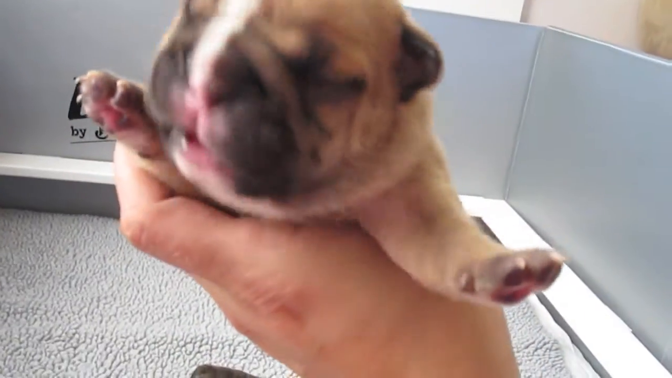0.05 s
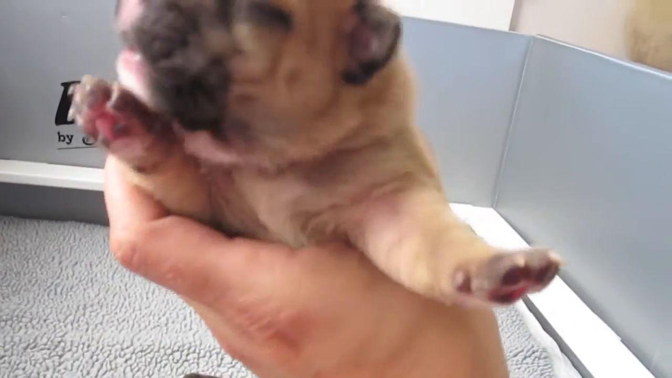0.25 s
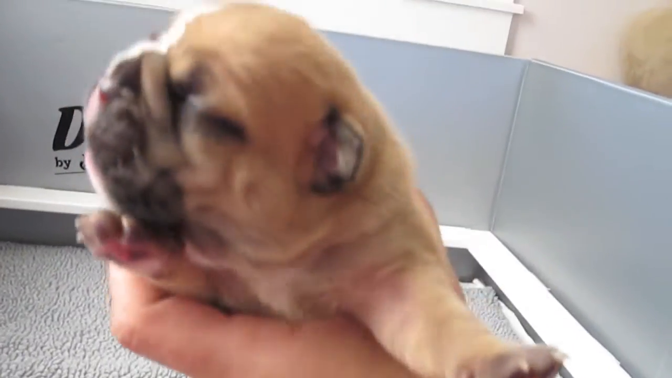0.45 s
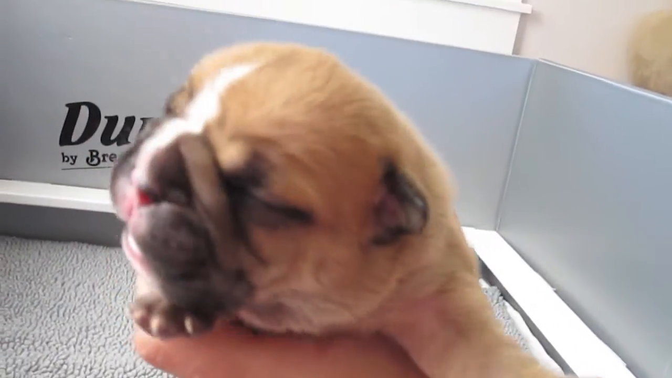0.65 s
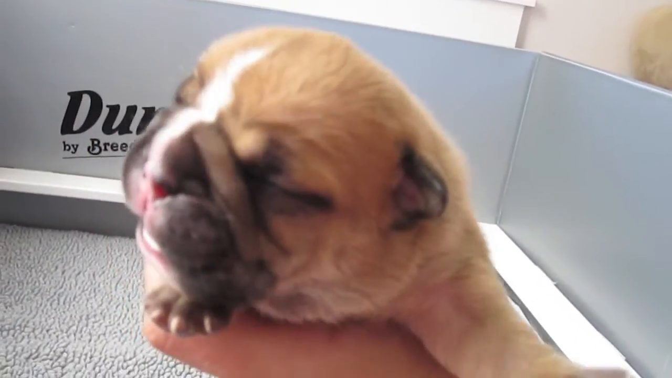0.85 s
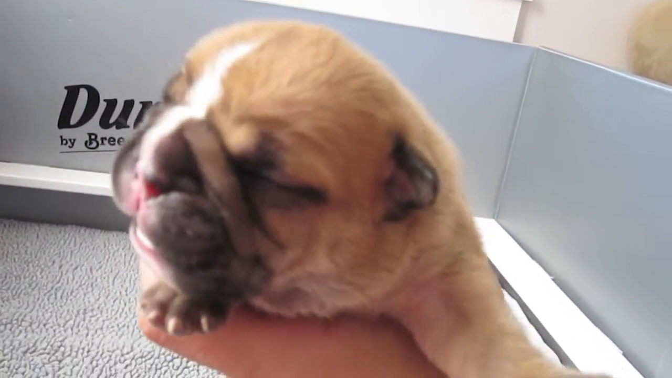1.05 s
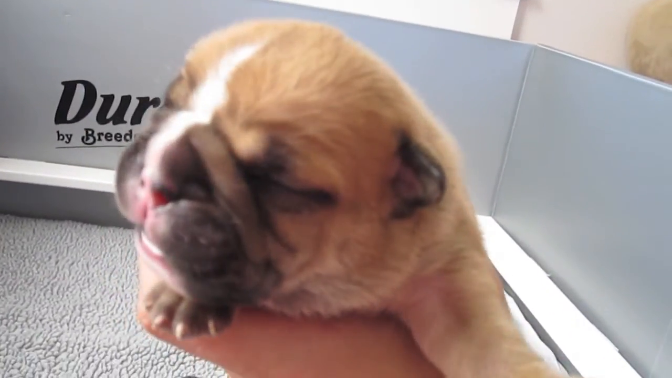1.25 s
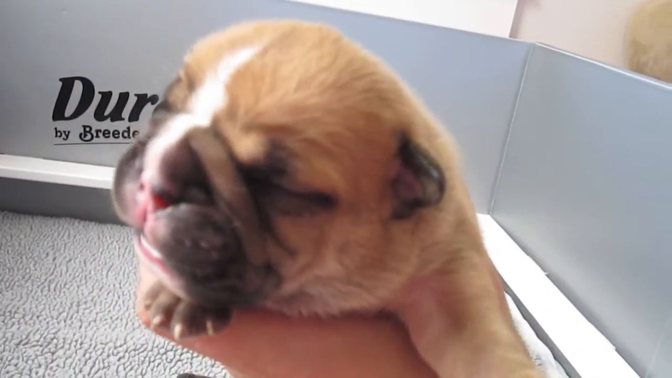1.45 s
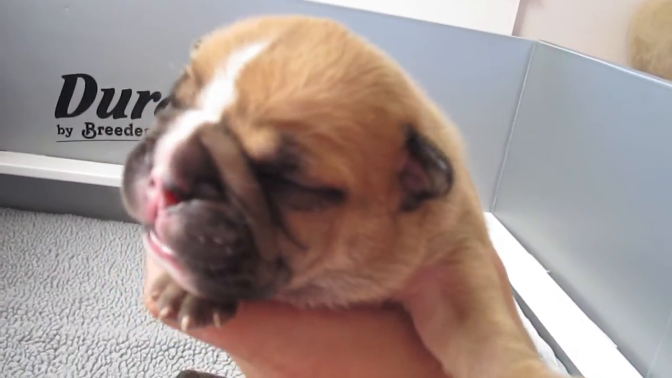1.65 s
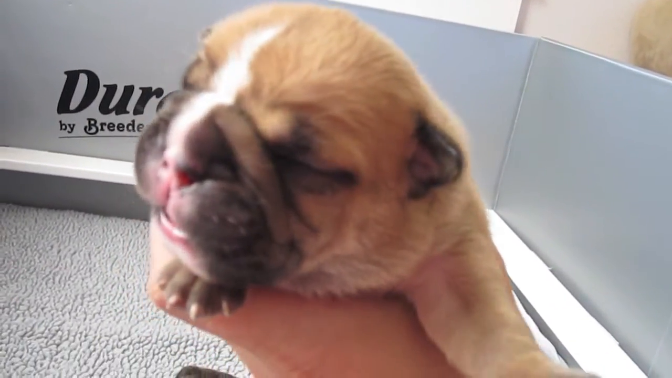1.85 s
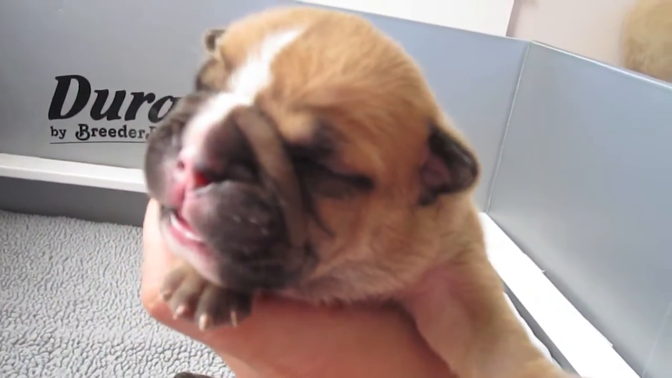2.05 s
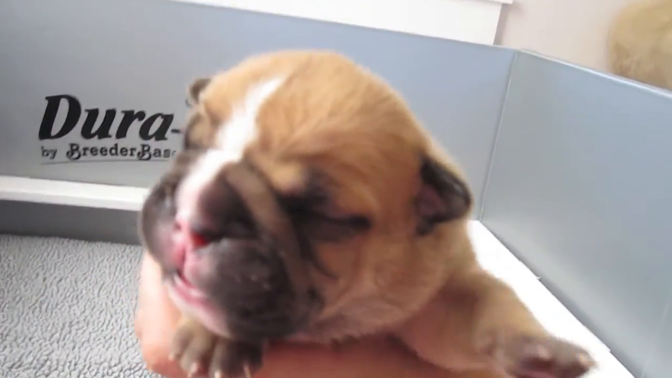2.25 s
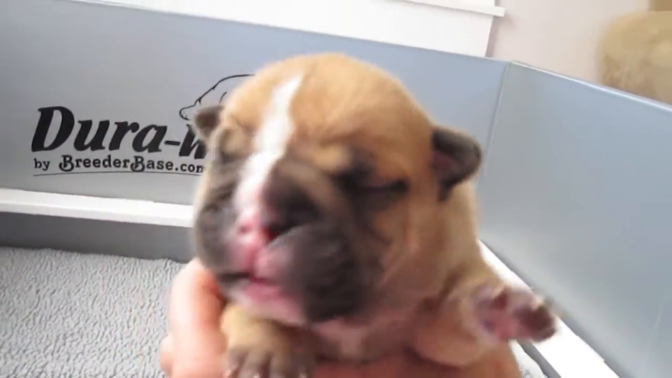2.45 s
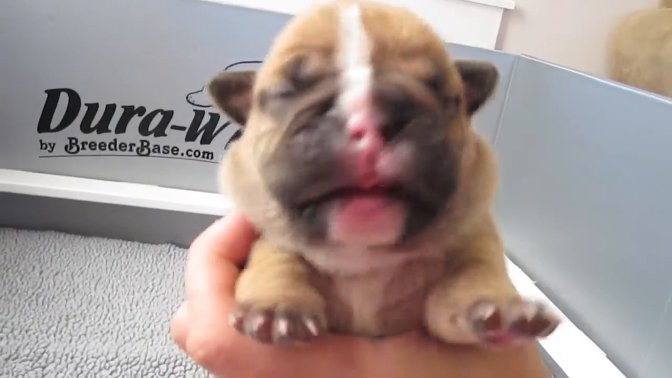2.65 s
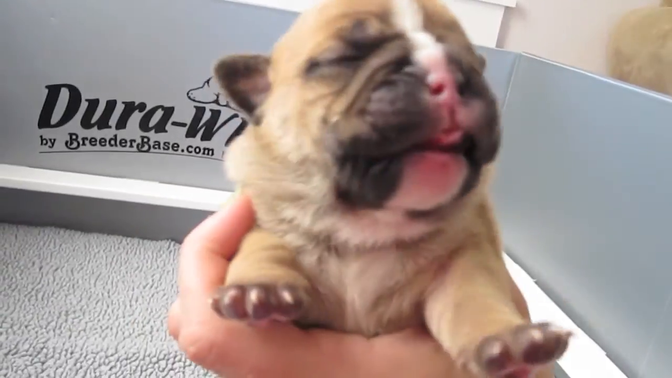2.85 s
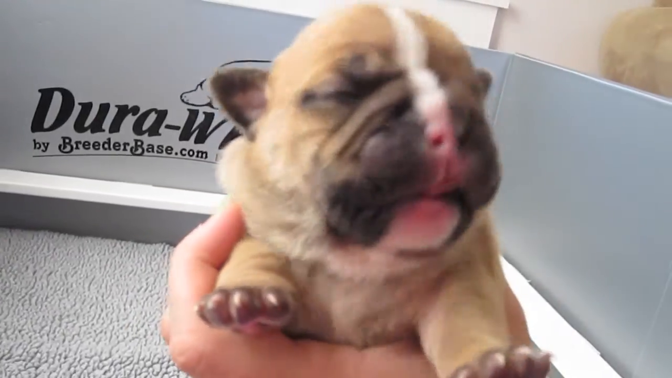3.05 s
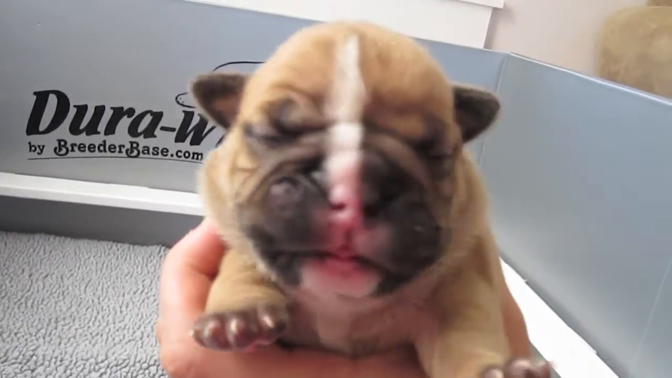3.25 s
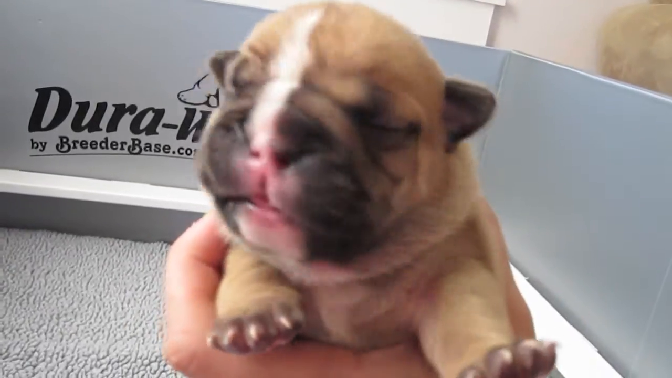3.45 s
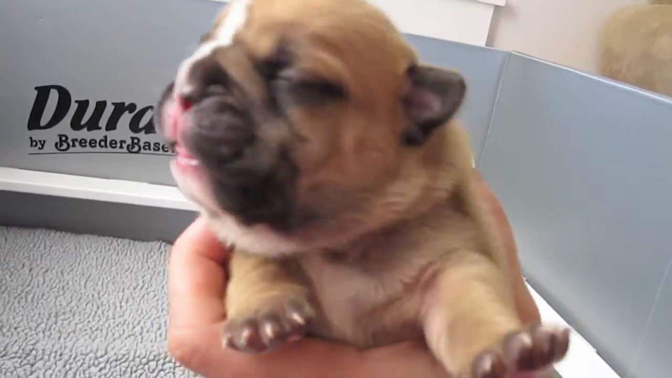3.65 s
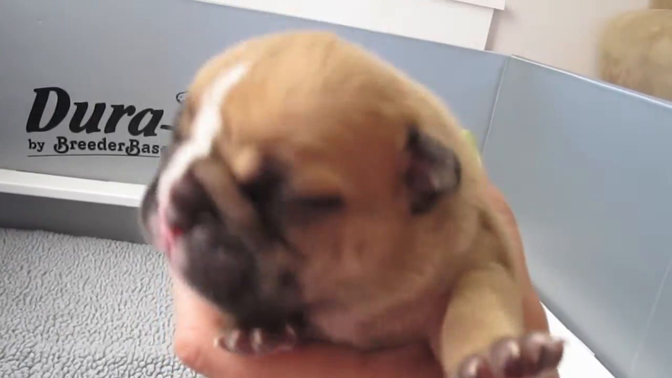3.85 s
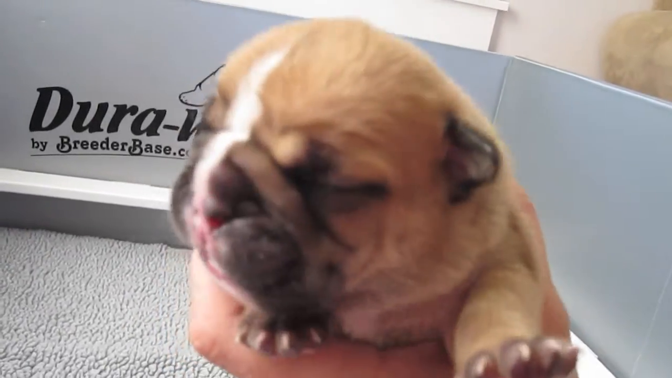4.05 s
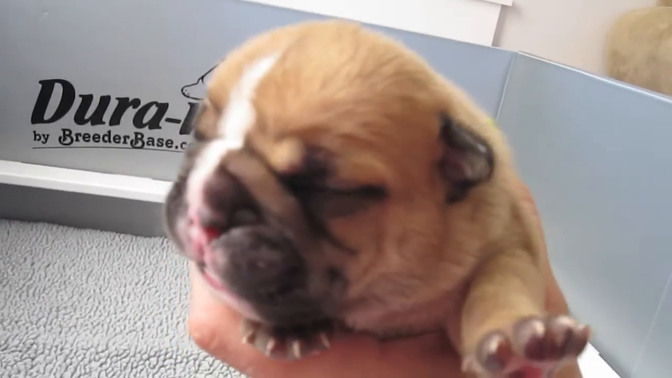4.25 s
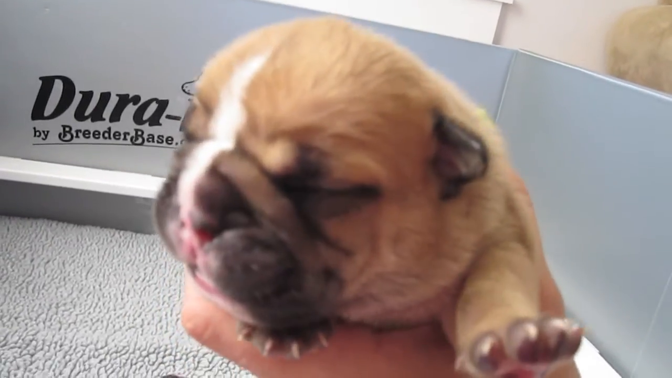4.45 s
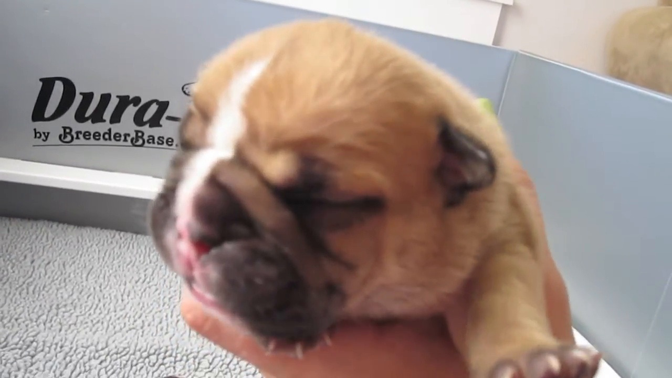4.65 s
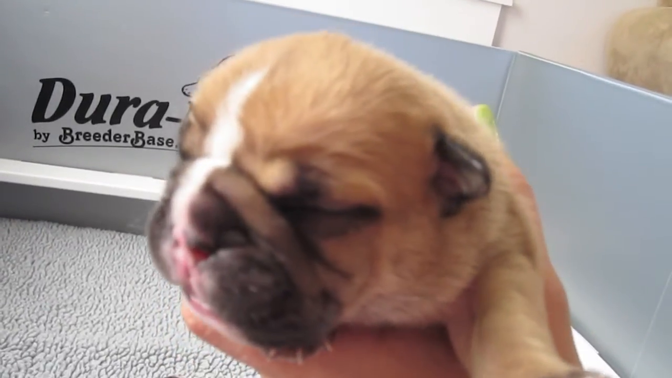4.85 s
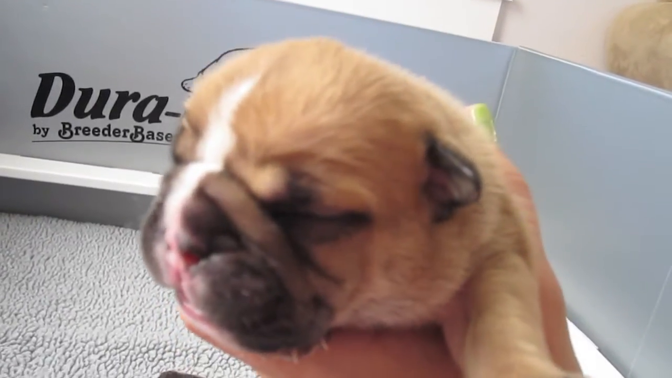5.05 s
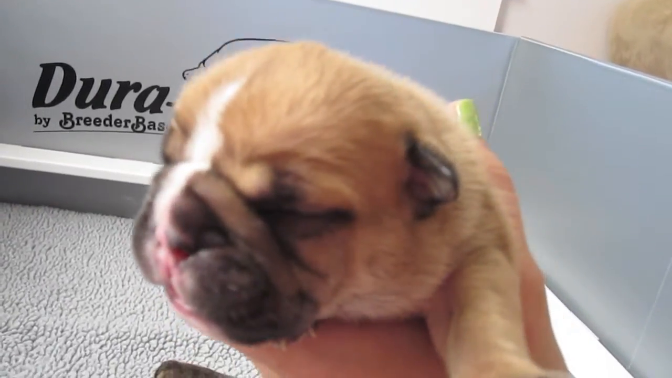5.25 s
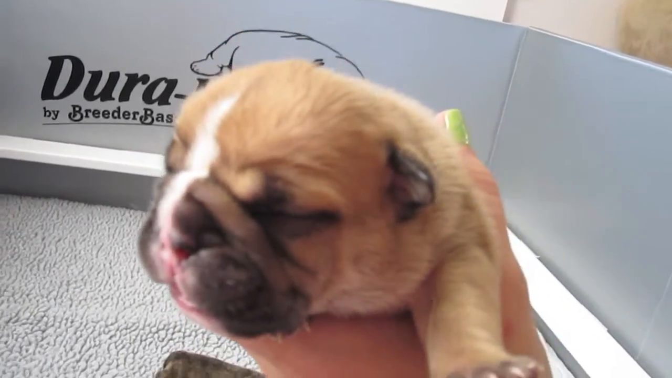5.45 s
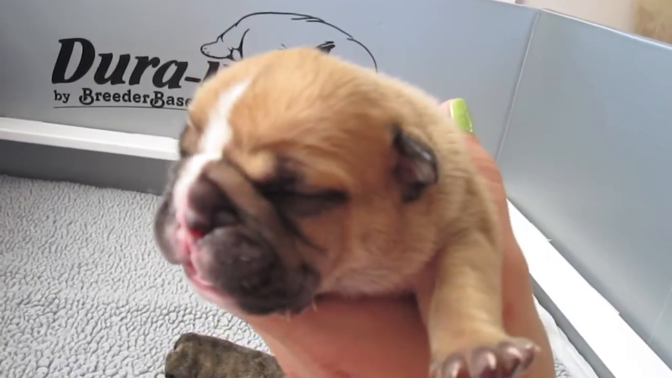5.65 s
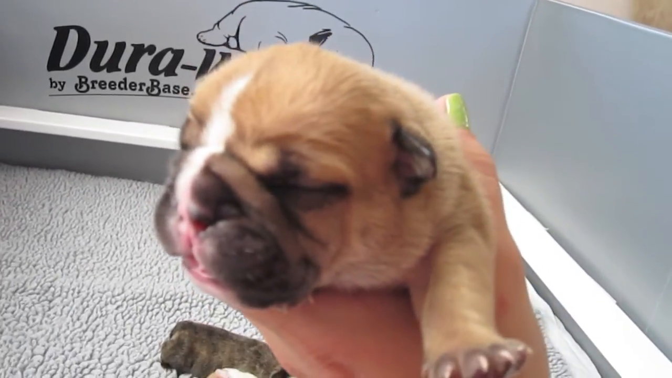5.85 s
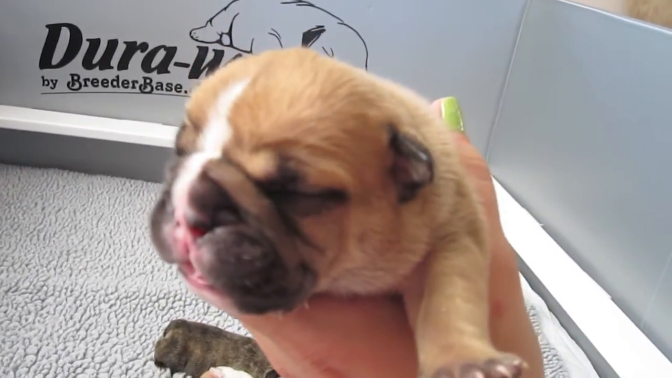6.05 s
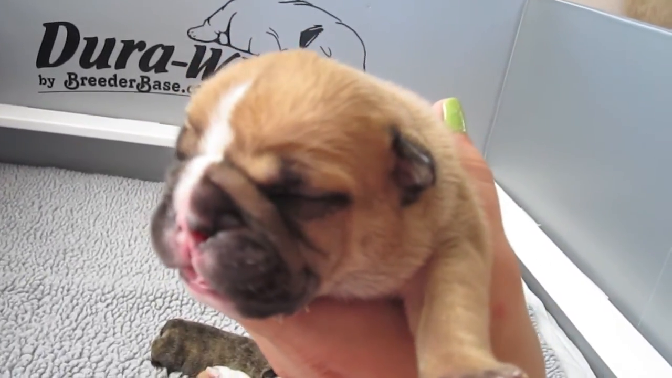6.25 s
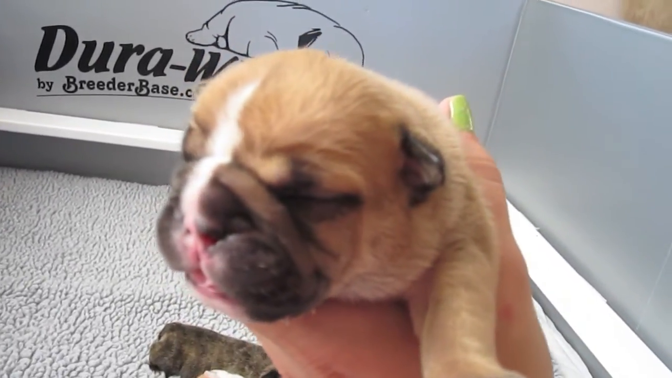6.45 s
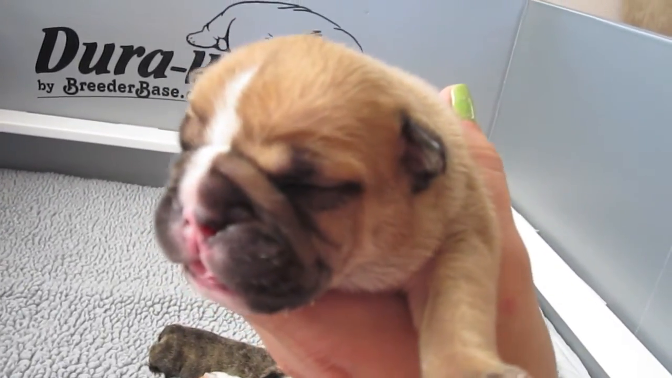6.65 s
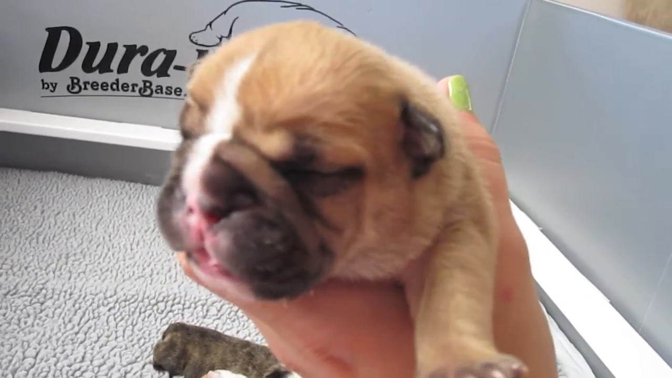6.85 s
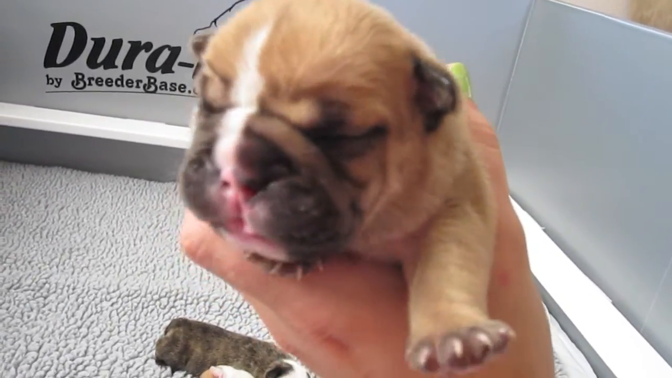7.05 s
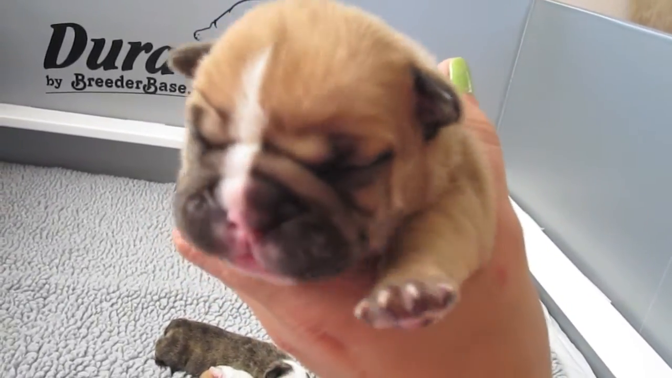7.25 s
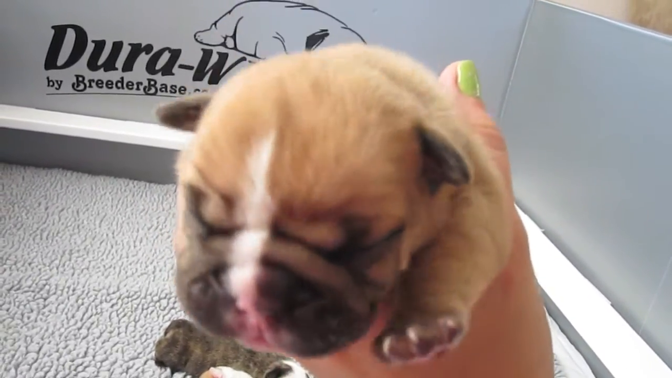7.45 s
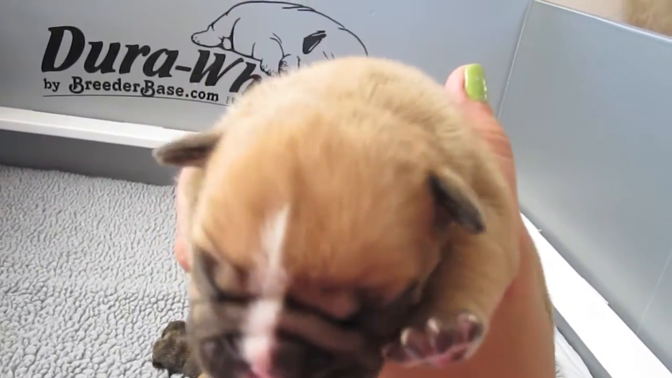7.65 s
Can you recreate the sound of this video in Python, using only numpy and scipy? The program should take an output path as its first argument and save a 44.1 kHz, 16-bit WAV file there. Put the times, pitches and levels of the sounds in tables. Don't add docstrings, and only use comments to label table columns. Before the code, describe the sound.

A newborn puppy grunts hoarsely and whimpers up close while thin high squeals, one sharp yelp and tiny lip clicks punctuate a humming room.

```python
import sys
import numpy as np
from scipy import signal
from scipy.fft import rfft, irfft, next_fast_len
from scipy.io import wavfile
from scipy.ndimage import uniform_filter1d

SR = 44100
rng = np.random.default_rng(int(sys.argv[2]) if len(sys.argv) > 2 else 0)


def convert_level_to_amplitude(level_db):
    exponent = np.asarray(level_db, float) / 20
    return 10 ** exponent


def output_pcm(signal):
    pcm = np.clip(np.atleast_2d(signal).T, -1, 1) * 32767
    wavfile.write(sys.argv[1], SR, np.round(pcm).astype(np.int16))


N = 340011
T = np.arange(N) / SR

# frequency in Hz, level in dB per Hz.
ROOM_HISS = [(15, -45), (25, -1.5), (53, -7), (107, -10), (260, -3), (290, -1.5), (553, -5), (1270, -4.5),
             (1380, -0.5), (1540, -3), (6950, -20.5), (7960, -19.5), (15600, -30.5)]
# centre in Hz, width in Hz, level in dB.
APPLIANCES = [(299, 7.1, -82.5), (373.3, 6, -68.5), (1293, 37, -63.5), (1521, 27, -60), (1851, 22, -63.5),
              (2785, 10, -73.5), (3785, 61, -70.5), (9140, 60, -76.5)]
# centre in Hz, width in Hz, level in dB.
MOTOR_MODES = [(79.6, 4.2, -4), (97.6, 30, 7.5), (105.4, 5.2, 3.5), (149, 180, -16.5)]
# time in seconds, level in dB.
MOTOR_LEVEL = [(0, -56), (1.5, -58.5), (2.5, -62), (3.5, -58.5), (6, -63), (7.71, -60)]
# frequency in Hz, level in dB.
CAMERA_WHINES = [(7867.1, -65), (6132, -75)]

# frequency in Hz, level in dB.
THROAT = [(400, -25), (700, -14), (870, -6.5), (1060, -4.5), (1280, 1.5), (1430, -11), (1550, 4),
          (1800, -31.5), (2100, -15), (2500, -69), (5000, -56)]
# frequency in Hz, level in dB.
MUZZLE = [(380, -22.5), (750, -10), (1250, 4.5), (1500, 1.5), (1800, -12), (2200, -9.5), (2450, -22.5),
          (4500, -53)]
# frequency in Hz, level in dB.
MOUTH = [(450, -18), (1080, -1), (1170, -12), (1270, 0.5), (1620, -6), (1900, -12), (2400, -25.5),
         (5000, -44)]
# frequency in Hz, level in dB.
OVERTONES = [(1700, -7), (2150, -14), (2350, -26.5), (2700, -37), (3600, -46.5), (6000, -71)]
# frequency in Hz, level in dB.
STRAIN = [(4000, -18), (5600, -13), (7000, 0), (8200, -4), (9400, -18), (10800, -8), (12300, -24),
          (14300, -11), (16000, -24)]
# frequency in Hz, level in dB per Hz.
NOSE_AIR = [(1500, -5), (3500, 14.5), (5000, 0), (6200, 8.5), (8500, -3), (11000, -2), (15000, -22)]

# start in seconds, length in seconds, level in dB, # tilt reached by the end in
# dB per octave.
GRUNTS = [
    (0.0, 0.098, -48, 28),
    (0.914, .106, -37, 2),
    (1.655, 0.073, -36.5, 12),
    (4.536, 0.091, -39, -6),
    (5.2, 0.092, -48, -13),
    (6.07, .05, -45.5, -12),
    (6.195, 0.037, -48, 4),
    (6.39, 0.061, -48.5, -12),
    (6.972, 0.1, -44, -12),
    (7.389, 0.031, -38.5, -14),
]
# time in seconds, level in dB, tilt in dB per octave.
GROWLS = [
    [(0.518, -42.5, -4), (0.548, -39, 0), (0.62, -34, 10), (0.655, -37, 15), (0.685, -37.5, 7),
     (0.695, -52, 7), (0.76, -54, 7)],
    [(1.25, -47, -7), (1.288, -40, 0), (1.34, -40, 3), (1.382, -34, 7), (1.425, -37.5, 13)],
]
# time in seconds, pitch in Hz, level in dB, tilt in dB per octave.
RASP = [
    [(3.84, 390, -44, 10), (3.862, 365, -36, 12), (3.9, 400, -39, 12), (3.95, 430, -48, 10),
     (4.035, 400, -37, 4), (4.052, 380, -44, 4)],
]
# time in seconds, pitch in Hz, level in dB, tilt in dB per octave.
CREAK = [
    [(6.69, 237.7, -48, 2), (6.72, 228.7, -42, -3.5), (6.757, 239, -45.5, -5)],
]
# start in seconds, length in seconds, first and last pitch in Hz, level in dB.
SQUEAKS = [
    (0.212, .053, 1047, 1094, -42),
    (0.265, 0.027, 1140, 980, -39.5),
    (2.655, .04, 1520, 1508, -34),
    (2.907, .02, 1413, 1051, -29.5),
    (2.987, 0.016, 1282, 1136, -25.5),
    (3.285, 0.022, 1495, 1481, -38.5),
]
# time in seconds, pitch in Hz, level in dB.
SQUEALS = [
    [(1.665, 858, -41.5), (1.71, 841, -51), (1.738, 903, -33), (1.762, 960, -49), (1.794, 877, -32),
     (1.81, 856, -49)],
    [(2.138, 1092, -40), (2.17, 1055, -39), (2.205, 1194, -33), (2.252, 1210, -31), (2.262, 1194, -34.5),
     (2.288, 1310, -25), (2.32, 1365, -29.5), (2.34, 1361, -30), (2.352, 1080, -34)],
    [(3.32, 1513, -33), (3.346, 1393, -26), (3.395, 1427, -28.5), (3.405, 1392, -27), (3.498, 1404, -26),
     (3.51, 1402, -26), (3.575, 1425, -29.5), (3.593, 1360, -25.5), (3.607, 1105, -33.5)],
]
# start in seconds, length in seconds, first and last pitch in Hz, level in dB.
THROBS = [
    (2.695, 0.062, 1443, 1435, -26.5),
    (2.75, 0.072, 1476, 1444, -26),
    (2.825, .05, 1493, 1413, -29.5),
    (2.875, 0.03, 1514, 1436, -29),
]
# time in seconds, pitch in Hz, level in dB,
# muzzle tilt in dB per octave.
MOANS = [
    [(1.792, 419, -33, 5), (1.851, 513, -34.5, 0.5), (1.887, 500, -34.5, -1), (1.912, 417, -44.5, -11)],
    [(4.262, 449, -39, -8), (4.285, 448.5, -33, 1), (4.31, 417, -32, 0), (4.34, 371, -37.5, -2)],
    [(4.878, 314.5, -36, -1.5), (4.905, 345, -36.5, -6), (4.948, 351.7, -32.5, -3.5), (4.96, 354, -39, -7),
     (4.98, 335, -45, -9)],
    [(7.6, 429, -36, -3), (7.632, 539, -39, 1), (7.672, 655, -29.5, 4.5), (7.71, 737, -39, -2)],
]
# start in seconds, length in seconds, first and last pitch in Hz, level in dB.
WHIMPERS = [
    (7.025, .066, 401, 423.4, -37.5),
    (7.3, 0.0857, 382, 445, -31.5),
]
# start in seconds, length in seconds, first and last pitch in Hz, level in dB.
PEEPS = [
    (2.25, .09, 1911, 2105, -56.5),
    (2.74, 0.029, 2208, 2060, -47),
    (2.805, .035, 2094, 2290, -50),
    (2.875, .045, 2280, 2160, -44),
    (3.398, .078, 2087, 2080, -48),
    (3.48, .052, 973, 881, -36),
]
# time in seconds, peak level in dB,
# upper ring against the whole in dB, upper ring in Hz.
CLICKS = [
    (2.462, -30.5, -18, 2730),
    (2.697, -26, -14, 2766),
    (3.014, -23.5, -31, 2744),
    (3.519, -22, -36, 2790),
    (4.24, -32, -22, 2780),
    (4.575, -37, -19, 2800),
    (4.843, -33.5, 2, 2870),
    (5.512, -48, -4, 2733),
    (5.714, -37, -20, 2748),
    (7.411, -19, -8, 2900),
]
# time in seconds, peak level in dB, upper ring against the whole in dB, upper ring in Hz.
TICKS = [
    (4.842, -38.5, 0, 4020),
    (5.458, -39.5, 0, 4305),
    (5.494, -42, 0, 3090),
    (5.615, -41, 0, 3524),
    (6.428, -44, 0, 4870),
    (6.712, -40, 0, 3800),
    (6.749, -38.5, 0, 3800),
]
# middle in seconds, length in seconds, level in dB.
HUFFS = [
    (2.473, 0.015, -53.5),
    (3.018, 0.033, -54),
    (3.535, 0.045, -54.5),
    (4.056, 0.022, -49),
    (4.591, 0.042, -51),
    (4.832, 0.054, -60),
    (4.887, 0.12, -54.5),
    (6.45, 0.037, -57),
    (6.983, 0.038, -59),
    (7.44, 0.065, -58),
]
# time in seconds, pitch in Hz, level in dB, mouth tilt in dB per octave.
GLIDES = [
    [(3.045, 465, -45, -8), (3.127, 532, -37.5, -6), (3.145, 575, -41, -10), (3.155, 585, -35.5, 2.5),
     (3.175, 616, -31, -3.5), (3.234, 666, -33.5, 3.5), (3.3, 643, -44.5, 1)],
    [(3.83, 914, -40, -5), (3.852, 722, -49, 5), (3.92, 901, -36.5, -3), (4.012, 704, -36, 6),
     (4.05, 690, -36, 4.5)],
    [(5.555, 610, -53, -13), (5.611, 710, -40.5, -4), (5.641, 727, -46, -6), (5.664, 708, -34, -1.5),
     (5.695, 775, -37, 4), (5.708, 890, -43.5, -17), (5.722, 930, -55, -7)],
    [(6.12, 698, -43.5, -10), (6.144, 650, -39.5, 0), (6.185, 602, -55, -17), (6.204, 632, -42.5, -2),
     (6.238, 611, -57, -15)],
]
# time in seconds, pitch in Hz, level in dB, mouth opening in dB,
# level of the upper partials in dB.
YELP = [
    [(3.738, 862, -46, 7.5, -81), (3.795, 1113, -25.5, 3, -62), (3.83, 1214, -18.5, 13.5, -57.5),
     (3.89, 1085, -27.5, 5, -57), (3.93, 1103, -26.5, 1.5, -58), (3.98, 1232, -22.5, 12.5, -54),
     (4.011, 1450, -16, 8, -62), (4.021, 1480, -24.5, 11, -55), (4.05, 1223, -54, 0, -73)],
]


def shape(points, hz):
    f, db = np.transpose(points)
    return convert_level_to_amplitude(np.interp(np.log(np.maximum(hz, 1)), np.log(f), db))


def unit(x):
    return x / np.sqrt(np.mean(x ** 2))


def noise(points):
    size = next_fast_len(N, real=True)
    hz = np.arange(size // 2 + 1) * SR / size
    spectrum = rfft(rng.standard_normal(size)) * shape(points, hz)
    return unit(irfft(spectrum, size)[:N])


def wander(hz):
    slow = signal.butter(2, hz, fs=SR / 16, output="sos")
    coarse = signal.sosfilt(slow, rng.standard_normal(N // 16 + 2))
    return np.interp(T, np.arange(len(coarse)) * 16 / SR, unit(coarse))


def drones(modes):
    out = np.zeros(N)
    for hz, width_hz, db in modes:
        ring = signal.lfilter(*signal.iirpeak(hz, hz / width_hz, SR), rng.standard_normal(N))
        out += convert_level_to_amplitude(db) * unit(ring)
    return out


def room():
    motor = convert_level_to_amplitude(np.interp(T, *np.transpose(MOTOR_LEVEL))) * unit(drones(MOTOR_MODES))
    hiss = convert_level_to_amplitude(-50.5 + .5 * wander(1.0)) * noise(ROOM_HISS)
    return hiss + drones(APPLIANCES) + motor


def camera_whine():
    frame_hz, frame_s = 29.97, .0027
    flip = np.tanh(8 * np.sin(np.pi * frame_hz * (T - frame_s)))
    return flip * sum(convert_level_to_amplitude(db) * np.sqrt(2) * np.sin(2 * np.pi * hz * T) for hz, db in CAMERA_WHINES)


def breath(tables, edge_s):
    s, *columns = np.vstack(tables).T
    order = np.argsort(s, kind="stable")
    controls = [uniform_filter1d(np.interp(T, s[order], c[order]), size=260) for c in columns]
    gate = np.zeros(N)
    for call in tables:
        opened = np.clip((T - call[0][0]) / edge_s + .5, 0, 1)
        closed = np.clip((T - call[-1][0]) / edge_s + .5, 0, 1)
        gate += opened - closed
    return controls + [np.clip(gate, 0, 1)]


def short_calls(rows, attack_s, release_s, rise_db, swell_db, fall_db, dip=0):
    drops = rise_db, swell_db, 0, fall_db
    held = 1, 1 - dip, 1 - dip, 1
    tables = []
    for s, length, first, last, db in rows:
        shares = 0, min(attack_s / length, .45), max(1 - release_s / length, .55), 1
        tables.append([(s + u * length, h * (first + u * (last - first)), db - drop)
                       for u, drop, h in zip(shares, drops, held)])
    return tables


def cycles(hz, jitter):
    return 2 * np.pi * np.cumsum(hz * (1 + jitter * wander(112.4))) / SR


def grunt(tables, rough):
    *controls, gate = breath(tables, edge_s=0.0047)
    on = gate > 0
    phase = cycles(controls[0], .1 * rough)[on]
    hz, db, tilt_db = (c[on] for c in controls)
    gains = [shape(THROAT, k * hz) * convert_level_to_amplitude(tilt_db * np.log2(k * hz / 1300)) for k in range(1, 10)]
    voiced = sum(g * np.sin((k + 1) * phase) for k, g in enumerate(gains))
    voiced = voiced * np.sqrt(2 / sum(g ** 2 for g in gains))
    spurts = convert_level_to_amplitude(4.5 * rough * wander(100)[on])
    air = noise(THROAT)[on]
    gate[on] *= convert_level_to_amplitude(db) * (np.sqrt(1 - rough ** 2) * spurts * voiced + rough * air)
    return gate


def grunts():
    pitch_hz, first_tilt_db = 432.4, 4
    rows = [(s, length, first_tilt_db, tilt_db, db) for s, length, db, tilt_db in GRUNTS]
    short = short_calls(rows, attack_s=0.034, release_s=.03, rise_db=7.5, swell_db=1, fall_db=2)
    hoarse = [[(s, pitch_hz, db, tilt_db) for s, tilt_db, db in call] for call in short]
    hoarse += [[(s, pitch_hz, db, tilt_db) for s, db, tilt_db in call] for call in GROWLS]
    return grunt(hoarse, rough=.6) + grunt(RASP, rough=.55) + grunt(CREAK, rough=.25)


def cry(tables, colour, jitter, air_db, edge_s=0.0012, flutter_db=1):
    *controls, gate = breath(tables, edge_s)
    on = gate > 0
    phase = cycles(controls[0], jitter)[on]
    controls = [c[on] for c in controls]
    tone = 0
    for k, gain in enumerate(colour(*controls)):
        flutter = convert_level_to_amplitude(flutter_db * wander(45)[on])
        tone = tone + gain * flutter * np.sin((k + 1) * phase)
    air = convert_level_to_amplitude(air_db) * noise(THROAT)[on]
    gate[on] *= convert_level_to_amplitude(controls[1]) * (np.sqrt(2) * tone + air)
    return gate


def thin(hz, db, open_db=0):
    return [np.ones(len(hz))] + [shape(OVERTONES, k * hz) * convert_level_to_amplitude(open_db) for k in (2, 3)]


def full(hz, db, tilt_db=0, mouth=MOUTH):
    gains = [shape(mouth, k * hz) * convert_level_to_amplitude(tilt_db * np.log2(k * hz / 1300)) for k in range(1, 8)]
    return gains / np.sqrt(np.sum(np.square(gains), axis=0))


def muffled(hz, db, tilt_db):
    gains = full(hz, db, tilt_db, mouth=MUZZLE)
    return np.vstack([gains[:4], gains[4:] * convert_level_to_amplitude(-12)])


def squeals():
    calls = SQUEALS + short_calls(SQUEAKS, attack_s=0.0027, release_s=0.005,
                                  rise_db=16.5, swell_db=1.0, fall_db=6)
    calls += short_calls(THROBS, attack_s=0.015, release_s=0.0133,
                         rise_db=1, swell_db=-0.5, fall_db=8, dip=0.039)
    return cry(calls, thin, jitter=0.0044, air_db=-39, flutter_db=.7)


def whimpers():
    short = short_calls(WHIMPERS, attack_s=.02, release_s=.02, rise_db=10, swell_db=3, fall_db=8)
    calls = MOANS + [[point + (0,) for point in call] for call in short]
    return cry(calls, muffled, jitter=.009, air_db=-16, edge_s=.012, flutter_db=1.8)


def peeps():
    calls = short_calls(PEEPS, attack_s=.012, release_s=0.023, rise_db=14, swell_db=-3.5, fall_db=6.5)
    return cry(calls, thin, jitter=0.0106, air_db=-49, flutter_db=5.0)


def clicks():
    out, t = np.zeros(N + 300), T[:300] - .002
    low = np.cos(2 * np.pi * 1300 * t) * np.exp(-(t / 0.00085) ** 2)
    for s, db, high_db, high_hz in list(CLICKS) + list(TICKS):
        high = np.cos(2 * np.pi * high_hz * t) * np.exp(-(t / 0.00065) ** 2)
        high_share = np.clip(convert_level_to_amplitude(high_db), 0, 1)
        start = int((s - .001) * SR)
        out[start:start + 300] += convert_level_to_amplitude(db) * ((1 - high_share) * low + high_share * high)
    return out[:N]


def huffs():
    puffs = sum(convert_level_to_amplitude(db) * np.exp(-(2 * (T - s) / length) ** 2) for s, length, db in HUFFS)
    return noise(NOSE_AIR) * puffs


def whines():
    return cry(GLIDES, full, jitter=.007, air_db=-18, flutter_db=1.5)


def yelp():
    *controls, gate = breath(YELP, edge_s=0.0026)
    on = gate > 0
    phase = cycles(controls[0], jitter=0.0043)[on]
    hz, level_db, open_db, strain_db = (c[on] for c in controls)
    tone = sum(convert_level_to_amplitude(level_db) * g * np.sin((k + 1) * phase) for k, g in enumerate(thin(hz, level_db, open_db)))
    for k in range(4, 15):
        patchy = convert_level_to_amplitude(strain_db + 4 * wander(25)[on])
        tone += patchy * shape(STRAIN, k * hz) * np.sin(k * phase)
    gate[on] *= np.sqrt(2) * tone
    return gate


def pen(x):
    t60_s, level_db = .6, -27
    t = T[:SR // 2]
    fade = np.exp(-np.log(1000) * t / t60_s) * np.clip(t / .02, 0, 1)
    tail = rng.standard_normal(len(t)) * fade
    tail = signal.lfilter(*signal.iirpeak(1350, 1.5, SR), tail)
    return convert_level_to_amplitude(level_db) * signal.fftconvolve(x, tail / np.sqrt(np.sum(tail ** 2)))[:N]


def scene():
    pups = grunts() + squeals() + whimpers() + peeps()
    pups += clicks() + huffs() + whines() + yelp()
    return (pups + pen(pups) + room())[None]


def top_cut(x):
    return signal.sosfilt(signal.butter(12, 16030, fs=SR, output="sos"), x)


def record(dry):
    low_pass = signal.ellip(12, .3, 70, 15760, fs=SR, output="sos")
    mix = signal.sosfilt(low_pass, dry + camera_whine())
    return top_cut(mix)


dry = scene()
out = record(dry)
output_pcm(out)
```